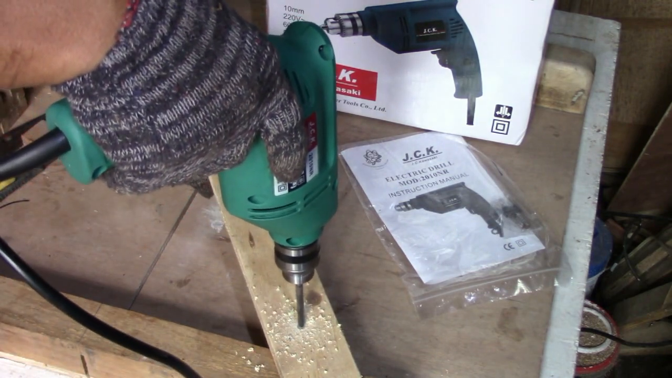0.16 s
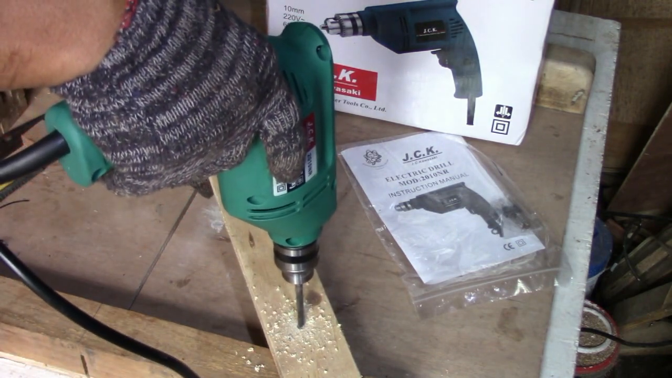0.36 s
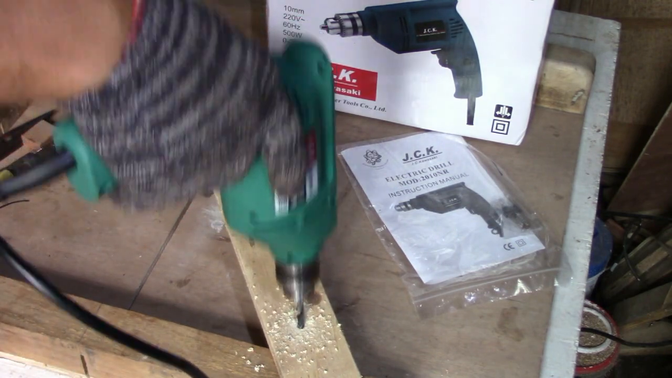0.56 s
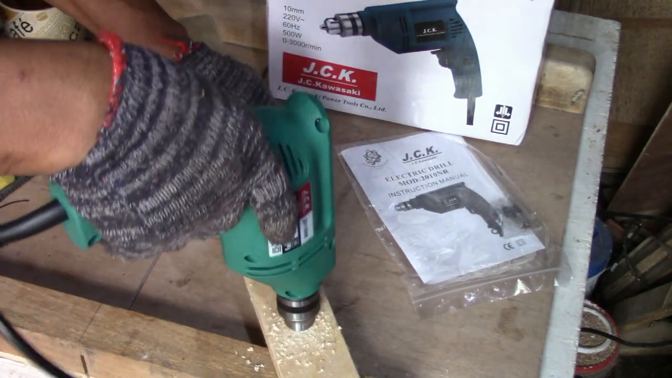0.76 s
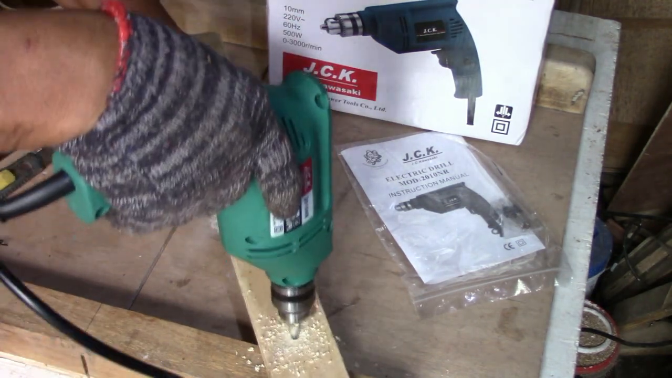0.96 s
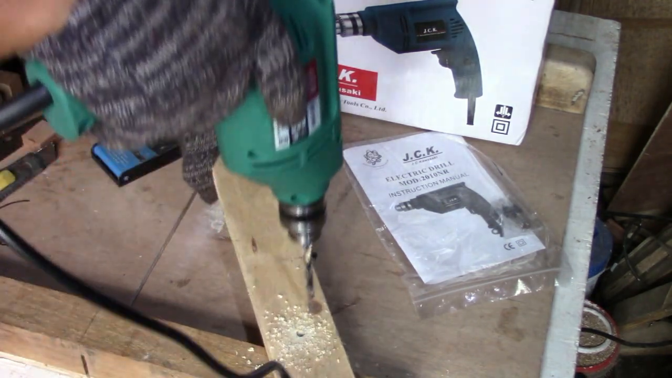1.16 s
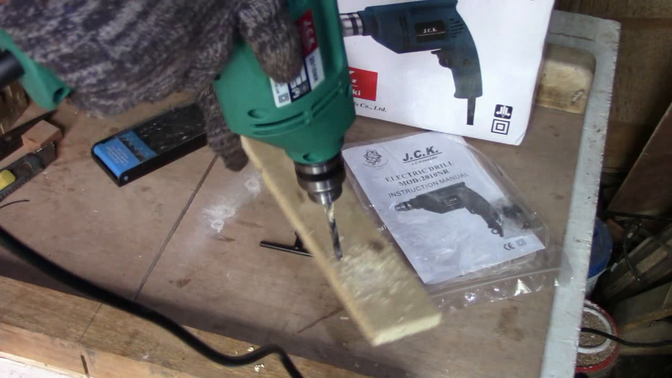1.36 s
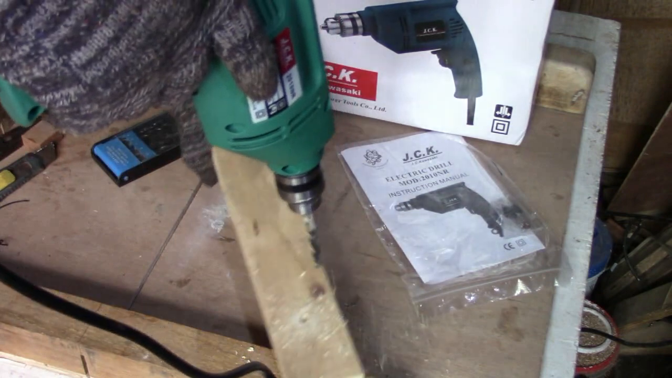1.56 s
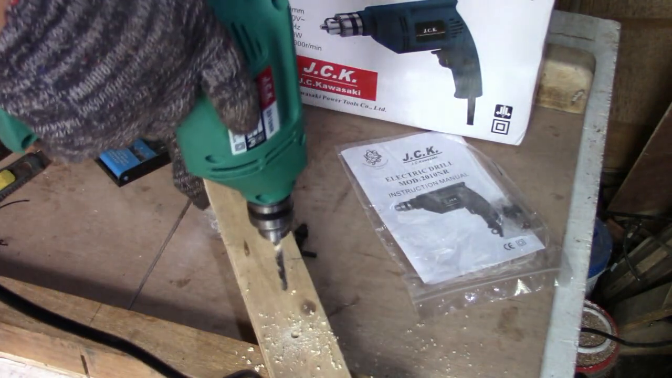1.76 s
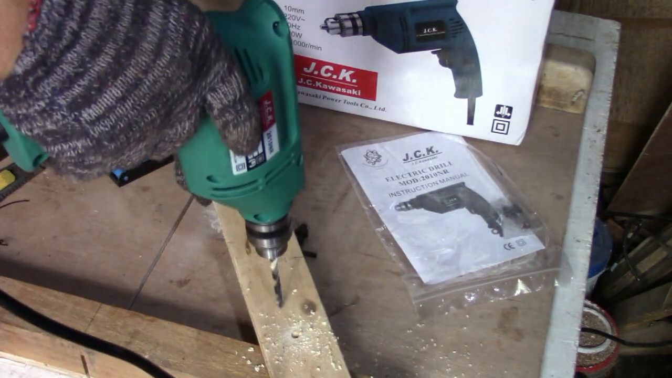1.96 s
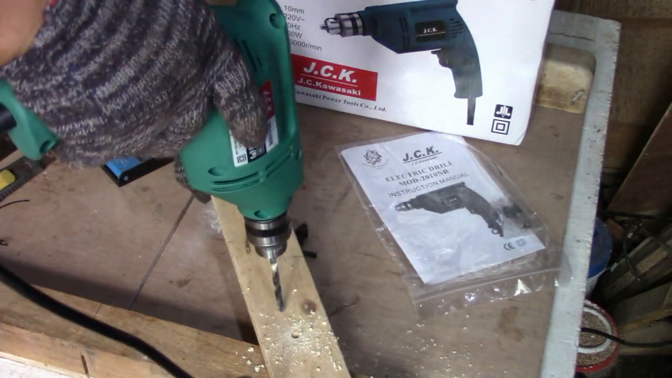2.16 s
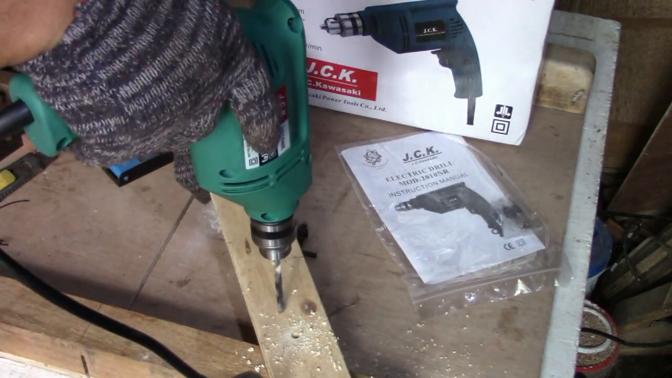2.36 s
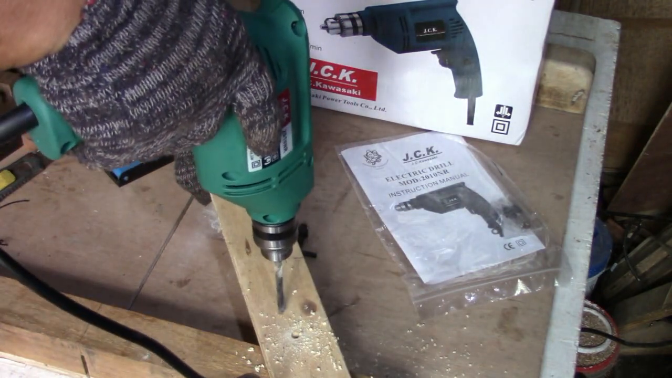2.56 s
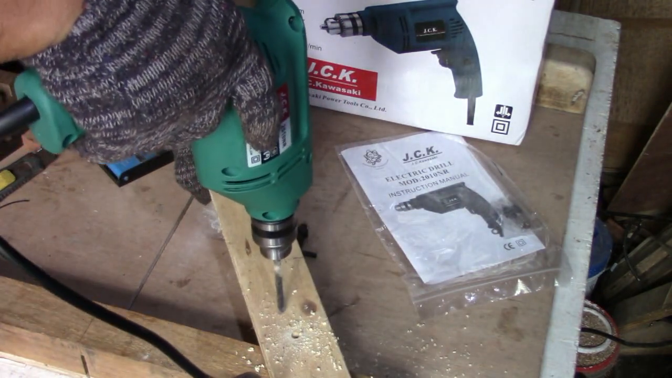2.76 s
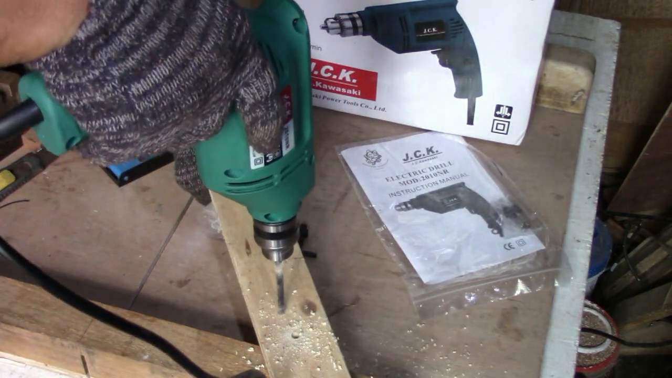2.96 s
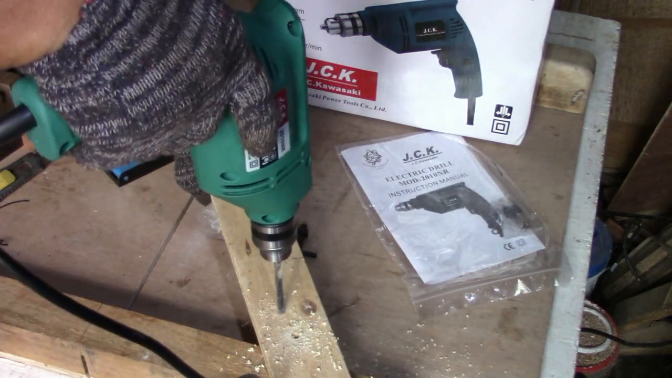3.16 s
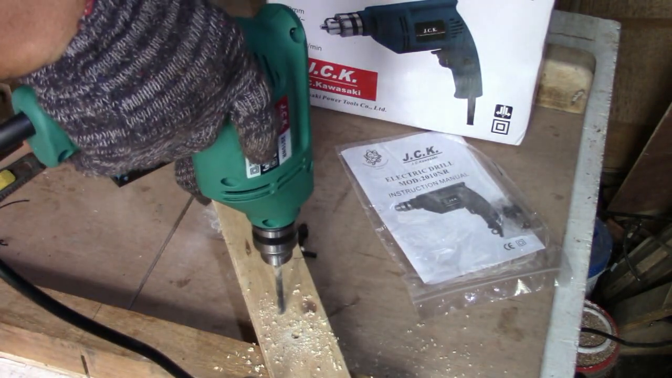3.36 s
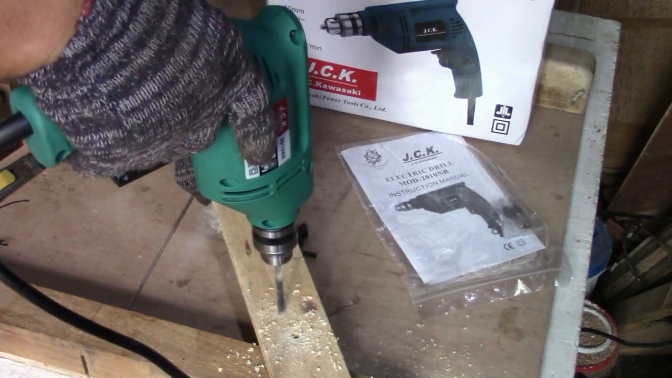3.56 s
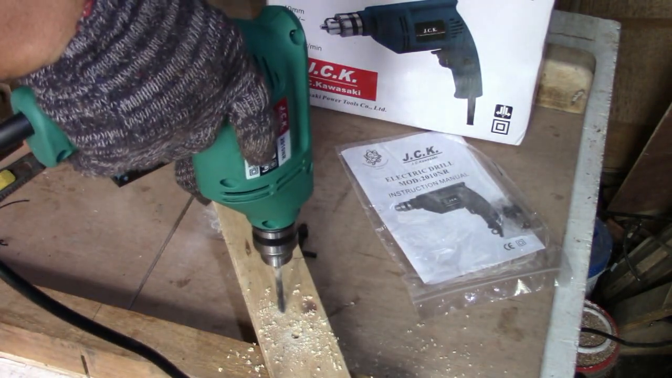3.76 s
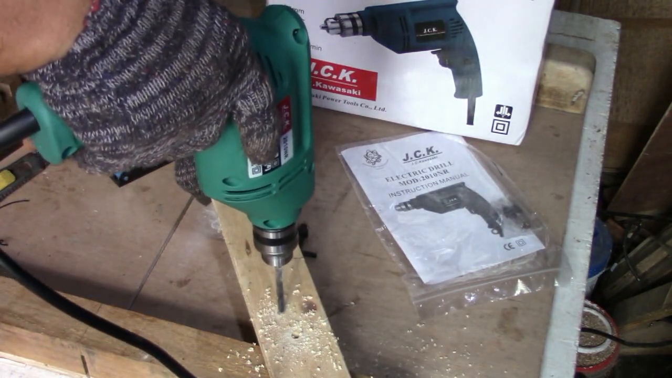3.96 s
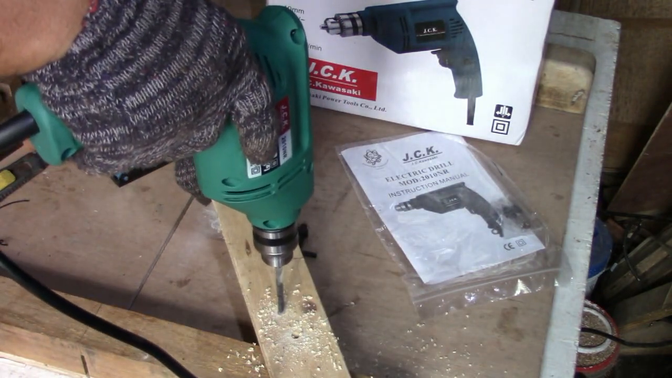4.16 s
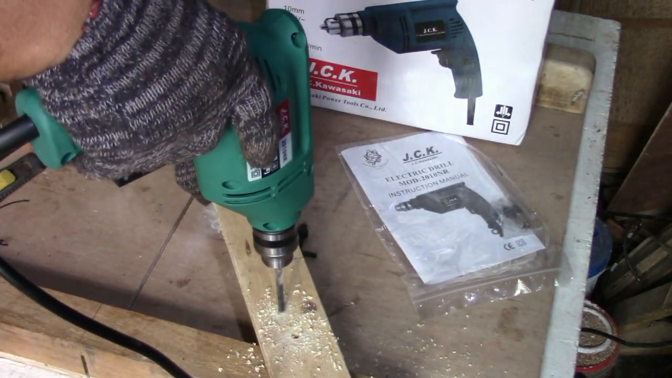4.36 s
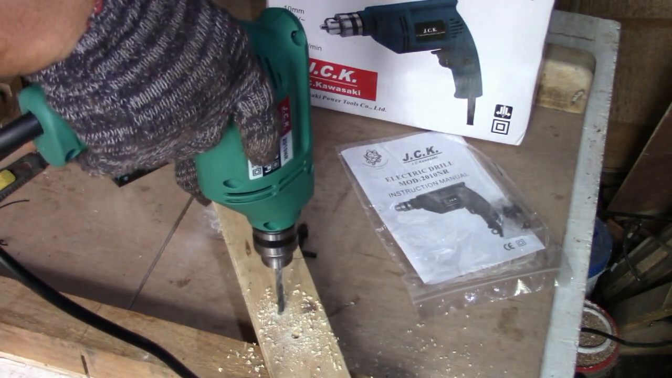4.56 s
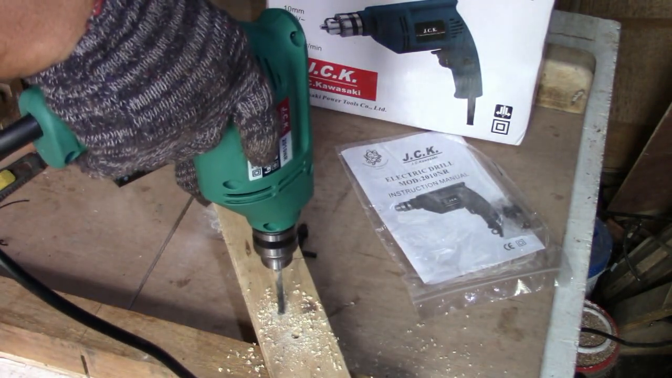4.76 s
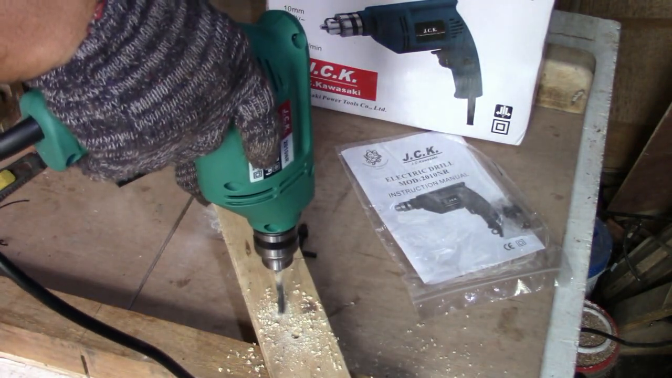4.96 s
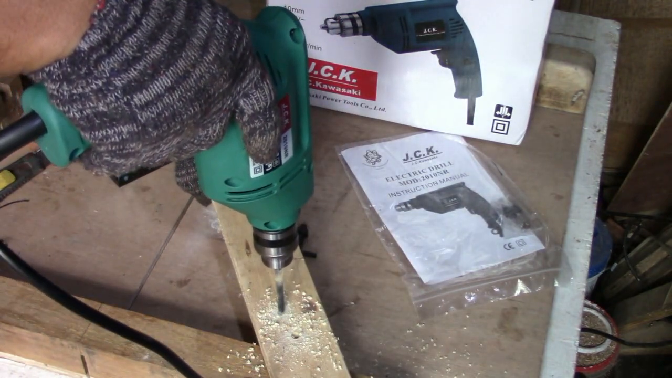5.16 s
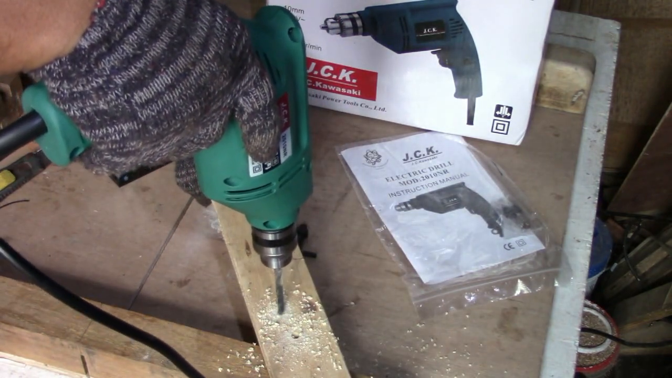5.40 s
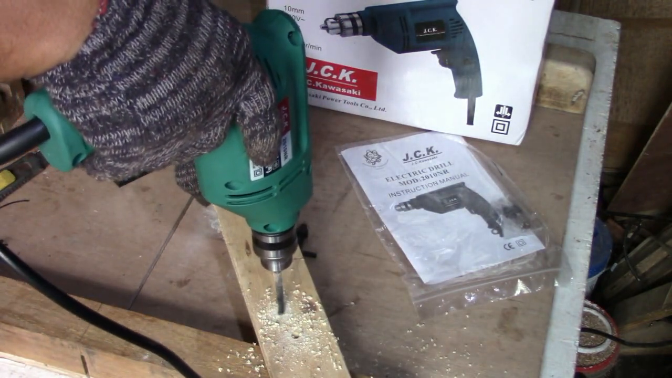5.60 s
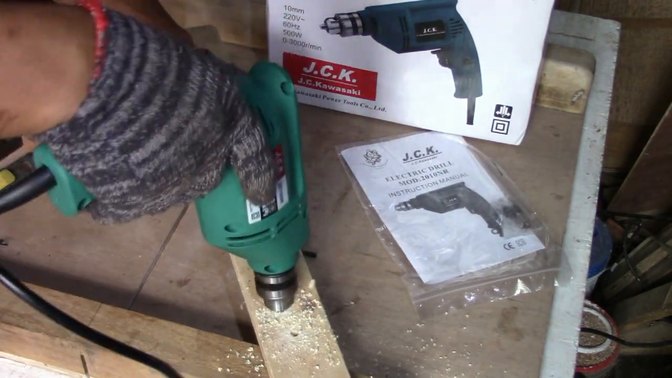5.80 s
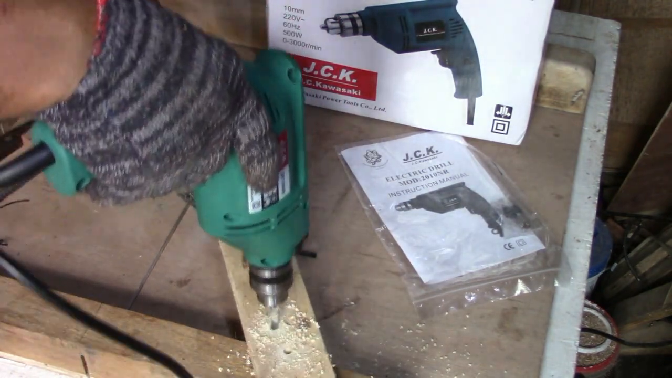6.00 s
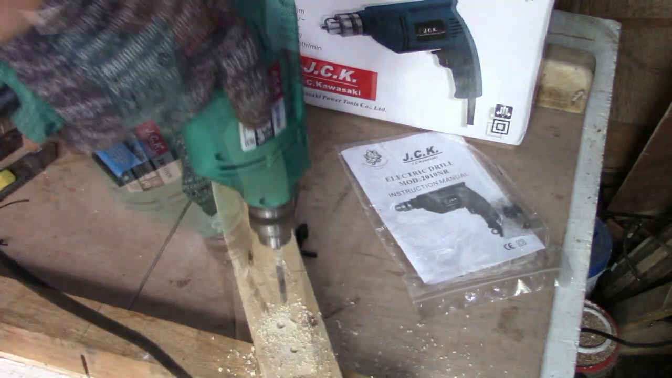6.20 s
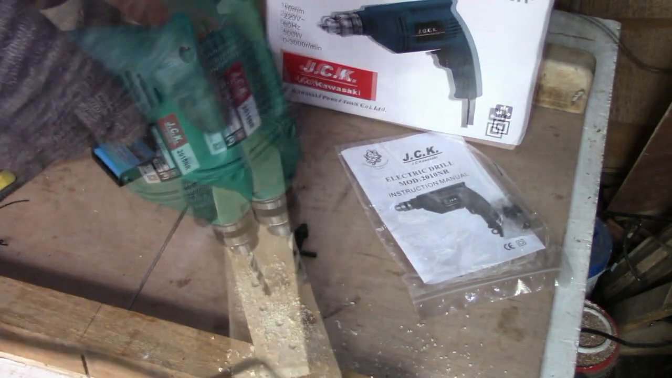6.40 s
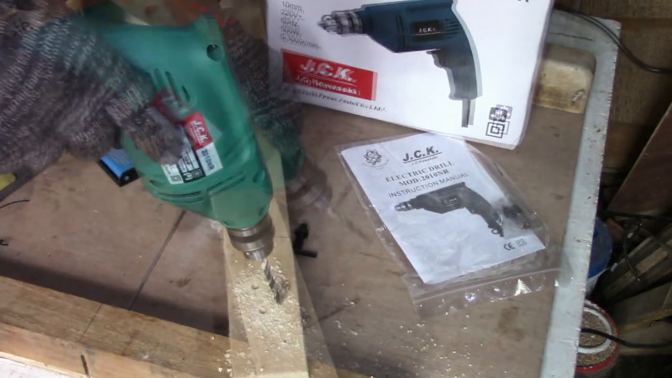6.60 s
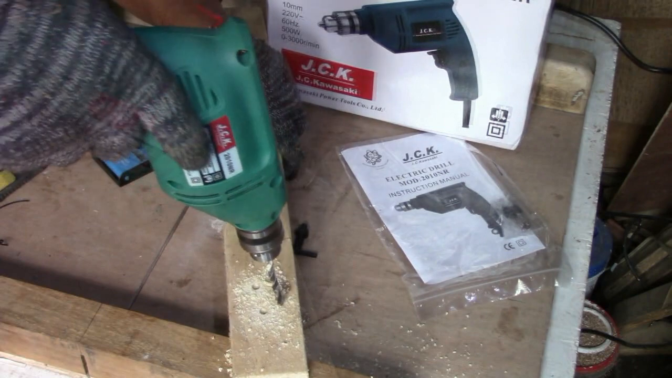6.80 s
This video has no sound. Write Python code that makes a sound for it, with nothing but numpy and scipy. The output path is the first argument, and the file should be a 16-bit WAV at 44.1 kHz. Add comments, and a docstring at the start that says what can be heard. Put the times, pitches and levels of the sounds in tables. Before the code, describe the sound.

A corded electric drill grinds through a plank, sags to a rattling idle with clacks, bores again at a harsh whine, then quickly winds down.

```python
"""On a workshop bench an electric drill bores into a plank, idles with rattling gears, bores again and winds down.
Modulated noise makes the air rush and brush sparks, shaft-locked sinusoids the whine of motor and gears.
Random tooth impacts make the rattle; all three ring through the resonances of the plastic housing.
The unloaded chuck clacks (filtered impacts), the plank knocks on the bench (decaying modes),
and low steady tones hum in the lull, with faint low-frequency air noise behind."""
import sys
import numpy as np
from scipy import signal
from scipy.fft import rfft, irfft
from scipy.io import wavfile
from scipy.ndimage import uniform_filter1d

SR = 44100
rng = np.random.default_rng(int(sys.argv[2]) if len(sys.argv) > 2 else 0)


def materialize(psi):
    """Save the field psi as 16-bit PCM at rate SR to the path in sys.argv[1].

    A 1-D psi becomes a single channel; in a 2-D psi each row is a channel.
    """
    bounded = np.clip(np.atleast_2d(psi).T, -1, 1)
    quanta = np.round(bounded * 32767).astype(np.int16)
    wavfile.write(sys.argv[1], SR, quanta)


N = 301644
TIME = np.arange(N) / SR

# Periods with the bit in the wood. Each row: entry in seconds, start of withdrawal in seconds,
# duration of withdrawal in seconds.
CUT_PERIODS = [(-.3, 0.653, 0.82), (2.442, 5.995, 0.32)]
BITE_S = 0.099  # the load builds up over this time
COAST_S, DIE_S = 6.03, 0.82  # the trigger is let go; length of the final fade
GEAR_RATIO = 15.6  # motor turns per turn of the chuck


def drill(cut_db=-2, air_db=-6, idle_air_db=1, slack_db=-1, tight_db=-8,
          top_db=-1, top_rise=0.81, chug_depth=0.46, scrape_db=-12):
    """Load-dependent excitation: load adds cutting noise and takes up gear slack; treble opens with speed."""
    # Motor shaft speed. Each row: time in seconds, speed in turns per second.
    speed_points = [(0, 416), (.45, 411), (.6, 352), (.8, 255), (1.08, 212), (1.36, 240), (2.47, 176),
                    (2.7, 338), (2.95, 422), (3.2, 442), (3.45, 433), (3.85, 425.5), (4.3, 396.4),
                    (4.68, 373.5), (5.45, 380), (5.65, 371), (5.9, 300), (6.25, 418), (6.45, 380),
                    (6.84, 275)]
    speed = glide(speed_points)
    load = np.clip(by_load(0.19, 0.98), 0, 1)
    turns = np.cumsum(speed * (1 + .0015 * wander(25))) / SR
    chuck_cycle = np.sin(2 * np.pi * turns / GEAR_RATIO)

    # the bit rubs once per turn of the geared-down chuck
    cutting = amp(cut_db) * load * (1 + 0.081 * chuck_cycle) * rush()

    # the tones smear while the shaft speeds up or brakes, and sink into the grind while it speeds up
    slew = uniform_filter1d(np.gradient(speed, TIME), size=4000)  # turns/s per second
    blur = np.minimum(abs(slew) / 7000, .08)
    spin_up_duck_db = -4 * np.clip(slew / 1400, 0, 1)
    whine_db = by_load(-9, 1.5) + spin_up_duck_db
    boring = housing(cutting + amp(whine_db) * whine(turns, blur), ring=1.07, tilt_db=-0.85)

    air_gain = amp(air_db + idle_air_db * (1.5 - load))
    air = air_gain * housing(rush(pulsing=0.043), ring=0.57, tilt_db=-1.0)

    # under load the teeth strike in bunches
    chug = 1 + chug_depth * load * chuck_cycle
    teeth = housing(gear_case(chug * rattle(turns)), ring=0.99, tilt_db=-1.5)
    teeth = amp(slack_db + tight_db * load) * teeth
    scrape = amp(scrape_db - 2.9 * load) * bearing(turns)
    x = boring + air + teeth + scrape

    # level the middle band, so that effort alone sets its loudness
    x = x / np.sqrt(uniform_filter1d(band(x, 1500, 9700) ** 2, size=6000))
    hz, spectrum = np.fft.rfftfreq(N, 1 / SR), rfft(x)
    low = irfft(spectrum / (1 + (hz / 1500) ** 4), N)
    top = irfft(spectrum * (1 - 1 / (1 + (hz / 7500) ** 8)), N)
    middle = x - low - top
    body = low * amp(by_load(4, -2))  # low body of plank and bench
    hiss = top * amp(top_db) * (speed / speed.mean()) ** top_rise  # fast air hisses brighter
    return (middle + body + hiss) * amp(effort_db(speed)) + squeak(turns)


def rush(mains_hz=120.7, pulsing=0.22, chop=0.064):
    """Amplitude-modulated noise: air and sparks swell each mains half wave; the bit chops them irregularly."""
    # mains_hz counts half waves
    swell = 1 + pulsing * np.sin(2 * np.pi * mains_hz * TIME) + chop * wander(54)
    return unit(swell * rng.standard_normal(N))


def whine(turns, blur, flutter=0.28, slip=0.3):
    """Order synthesis: fan, commutator and gear tones follow the shaft, trembling in strength and phase."""
    # Shaft orders. Each row: multiple of the shaft speed, relative level in dB.
    orders = [(3, -18.5), (3.64, -25), (4, -25), (6, -22), (7, -28), (8.5, -20.5), (9, -19.5), (10, -15.5),
              (11, -28), (12, -24), (14.5, -25), (15, -20.5), (18, -23)]
    tremble, drift = wander(42), wander(88)
    out = np.zeros(N)
    for multiple, db in orders:
        strength = np.roll(tremble, rng.integers(N))
        phase = np.roll(drift, rng.integers(N))
        angle = 2 * np.pi * (multiple * turns + rng.random())
        angle = angle + (slip + blur * multiple) * phase
        out += amp(db) * (1 + flutter * strength) * np.cos(angle)
    return np.sqrt(2) * out


def rattle(turns, chance=.62, looseness=.15):
    """Backlash impacts: on some turns of the shaft the gear teeth cross their slack and strike."""
    out, count = np.zeros(N), np.arange(1, int(turns[-1]))
    jittered_turn = count + looseness * rng.standard_normal(len(count))
    when = np.interp(jittered_turn, turns, TIME)
    for s in when[rng.random(len(when)) < chance]:
        strength_db = 2 * np.clip(rng.standard_normal(), -2, 1)
        add(out, s, amp(strength_db) * strike())
    return unit(out)


def strike(scatter=0.3, fade_s=0.002, size=600):
    """Impulsive contact: a sharp blow and a brief decaying chatter, with unit energy together."""
    blow = scatter * rng.standard_normal(size) * np.exp(-np.arange(size) / SR / fade_s)
    blow[0] += 1
    return blow / np.linalg.norm(blow)


def gear_case(x):
    """Resonance: adds the short ring of the gear case to tooth impacts."""
    # Each row: frequency in Hz, width in Hz, gain in dB.
    case_modes = [(1483, 330, -3.5), (2997, 250, -4)]
    return x + sum(amp(db) * band(x, hz - width / 2, hz + width / 2) for hz, width, db in case_modes)


def bearing(turns, size=128, grit=0.29):
    """Periodicity: a scrape recurs each turn, never quite alike, giving a comb of faint high lines."""
    harmonics = np.exp(2j * np.pi * rng.random(size // 2))
    one_turn = irfft(harmonics, 8 * size)
    scrape = np.interp(turns % 1, np.arange(8 * size) / (8 * size), one_turn)
    return unit(band(scrape * (1 + grit * wander(13)), 4900, 6740))


def squeak(turns, level_db=-42, lo_hz=9200, hi_hz=10100, uneven_db=3):
    """Friction noise: as the drill coasts, a thin high rub swells once per turn of the chuck."""
    strokes = 0.27 + np.sin(np.pi * turns / GEAR_RATIO) ** 4
    strokes = strokes * amp(uneven_db * wander(15))
    rub = unit(band(rng.standard_normal(N), lo_hz, hi_hz) * strokes)
    return amp(level_db) * rub * ramp(COAST_S, 0.52) * (1 - .75 * ramp(COAST_S, DIE_S) ** 4)


def housing(x, ring=1.0, tilt_db=0.0, size=4096):
    """Minimum-phase resonance: rings x through the drill's body with a causal, unit-energy response."""
    # Broad colour of the drill. Each row: frequency in Hz, relative level in dB.
    colour = [(30, -76), (100, -67), (170, -47), (300, -37.5), (500, -30.5), (1000, -27.5), (1600, -34),
              (2300, -21.5), (4000, -23), (6200, -16), (8400, -30), (10000, -20), (11500, -34),
              (14000, -38), (15000, -50)]
    # Resonances of housing, chuck and bit. Each row: frequency in Hz, width in Hz, gain in dB before ring.
    resonances = [(707, 210, 3), (1254, 254, 9), (1557, 355, 12.5), (1792, 427, 12), (2148, 21, 8.5),
                  (2402, 46, 7), (2620, 27, 8.5), (2810, 37, 8), (2954, 890, 6), (3527, 432, 16.5),
                  (3745, 79, 9), (4020, 680, -1.5), (4484, 870, 14), (4830, 32, 10), (6370, 230, -3.5),
                  (6710, 24, 10.5), (11360, 490, 11.5)]
    hz = abs(np.fft.fftfreq(size, 1 / SR))
    db = read(colour, hz) + tilt_db * np.log2(1 + hz / 500)  # tilt nears dB per octave in the treble
    db = db + ring * sum(d / (1 + (2 * (hz - f) / w) ** 2) for f, w, d in resonances)
    # the Hilbert transform of the log magnitude gives the phase
    response = np.fft.ifft(np.exp(np.conj(signal.hilbert(np.log(amp(db)))))).real
    return signal.oaconvolve(x, response / np.linalg.norm(response))[:N]


def effort_db(speed):
    """Radiated level grows with speed and load; the bit grabs, and the level dies after the trigger's release."""
    # The bit grabs (+) or eases (-) in the grain. Each row: centre in seconds, half length in seconds,
    # level change in dB.
    grabs = [(0.352, .14, -1), (0.613, 0.067, 1.5), (0.702, 0.033, -3.5), (0.76, 0.018, 4.5),
             (0.982, 0.045, 3), (2.623, 0.19, 4), (3.187, 0.14, 1), (3.746, 0.18, -1.5),
             (4.683, 0.091, 2.5), (5.338, 0.22, -1.5), (5.673, 0.14, 1.5), (5.81, 0.012, -3.5),
             (5.87, 0.056, 2), (5.971, 0.041, -2)]
    octaves = np.log2(speed / 393)  # relative to a cruising speed in turns per second
    running_free = -19.5 + 4.5 * octaves
    added_by_load = contact() * (5.5 + 1 * octaves)
    grabbing = sum(db * np.exp(-((TIME - s) / half_s) ** 2) for s, half_s, db in grabs)
    # a quick drop, then an ever faster fade
    coast = -6.5 * ramp(COAST_S, 0.25) - 12.5 * ramp(COAST_S, DIE_S) ** 6.0
    return running_free + added_by_load + grabbing + coast


def contact():
    """Quasi-static loading: firmness of the bit in the wood, 0-1, through bite, hold and withdrawal."""
    return sum(ramp(enter, BITE_S) - ramp(leave, out_s) for enter, leave, out_s in CUT_PERIODS)


def by_load(free, cutting):
    """Linear load dependence: moves from the free-running to the cutting value as the bit bites."""
    return free + (cutting - free) * contact()


def clacks(ring=0.8, tilt_db=-2, scatter=0.7, fade_s=0.00077):
    """Impact response: single hard clacks of the slack chuck and gears, with little top treble."""
    # Each row: time in seconds, peak level in dB before a common trim.
    clack_times = [(1.124, -6), (1.224, -7), (1.289, -5), (1.314, -8), (1.35, -6), (1.425, -8), (1.466, -7),
                   (1.494, -9), (1.555, -7), (1.611, -6), (1.632, -5), (1.922, -9), (2.004, -11),
                   (2.146, -7), (2.218, -8), (6.253, -6), (6.287, -9), (6.408, -11), (6.428, -11),
                   (6.467, -11), (6.495, -12), (6.582, -14), (6.64, -16), (6.727, -15)]
    out = np.zeros(N)
    for s, peak_db in clack_times:
        blow = gear_case(strike(scatter, fade_s))
        clack = band(housing(blow, ring=ring, tilt_db=tilt_db), 500, 6500)
        add(out, s - .0005, amp(peak_db - .7) * clack / abs(clack).max())
    return out


def knocks(level_db=-9, size=9000):
    """Modal excitation: the plank lifts and chatters on the bench, exciting its decaying modes."""
    # Each row: time in seconds, relative level in dB.
    knock_times = [(0.725, -20), (1.073, -19.5), (2.447, -24), (5.838, -19), (6.594, -25.5)]
    # Modes of the plank. Each row: frequency in Hz, relative level in dB, 60 dB decay time in seconds.
    plank_modes = [(190, -12, 0.18), (357, -11, 0.33), (530, -3, 0.071), (695, 9.5, 0.024), (956, 3.5, .05)]
    out, t = np.zeros(N), TIME[:size]
    wood = sum(amp(db - 60 * t / t60) * np.sin(2 * np.pi * f * t) for f, db, t60 in plank_modes)
    for s, knock_db in knock_times:
        chatter = rng.standard_normal(size) * np.exp(-t / 0.017)
        knock = band(signal.fftconvolve(chatter, wood), 400, 3000)
        add(out, s, amp(knock_db + level_db) * knock / (abs(knock).max() / 2))
    return out


def hum():
    """Additive synthesis: low steady tones waver together slightly in level."""
    # Each row: frequency in Hz, relative level in dB.
    hum_tones = [(156.1, -73.5), (258.4, -61), (414.5, -55), (479.1, -51.5), (522.2, -66), (597.5, -52.5),
                 (882.9, -53.5)]
    # Common gain, highest in the lull. Each row: time in seconds, gain in dB.
    hum_gain = [(0, -14), (1.3, 5), (2.7, -1.5), (6.84, -13)]
    tones = sum(amp(db) * np.sin(2 * np.pi * (f * TIME + rng.random())) for f, db in hum_tones)
    return np.sqrt(2) * tones * amp(curve(hum_gain) + 2.2 * wander(5.9))


def draught(gust_db=3.0):
    """Turbulent pressure noise: lumpy cooling air, independent in each channel."""
    # it blows hardest as the motor speeds up for the second cut, then settles
    start = CUT_PERIODS[1][0]
    puff_db = 14 * ramp(start, BITE_S) * np.exp(-abs(TIME - start) / 2)
    level_db = by_load(-95, -79) + puff_db
    channels = []
    for _ in range(2):
        air = unit(band(rng.standard_normal(N), 28, 130))
        channels.append(air * amp(level_db + gust_db * wander(5.5)))
    return np.array(channels)


def workshop(x, size=8192):
    """Diffuse reflection: direct sound stays central; bench and wall reflections spread it sideways."""
    # Each row: frequency in Hz, left-right likeness from 0 to 1.
    likeness = [(200, .95), (1000, .92), (2500, .82), (3600, .88), (6000, .72), (10000, .45)]
    # Each row: frequency in Hz, left minus right level in dB.
    balance = [(100, 1), (500, -2), (2400, -1.8), (8000, -0.6)]
    hz = np.fft.rfftfreq(N, 1 / SR)
    t = TIME[:size]
    echoes = rng.standard_normal(size) * amp(-60 * t / .25) * (t > .004)  # 60 dB decay in 0.25 s
    direct = rfft(x)
    spread = direct * rfft(echoes / np.linalg.norm(echoes), N)
    same = np.clip(read(likeness, hz), 0, .95)
    lean = amp(read(balance, hz) / 2)
    side = spread * np.sqrt((1 - same) / (1 + same))
    return irfft(np.array([(direct + side) * lean, (direct - side) / lean]), N)


def amp(db):
    """Logarithmic level: decibels to gain."""
    return 10 ** (np.asarray(db) / 20)


def unit(x):
    """Power normalisation: scales to rms 1."""
    return x / np.sqrt(np.mean(x ** 2) + 1e-20)


def curve(rows):
    """Linear interpolation: a time table at every sample."""
    return np.interp(TIME, *np.transpose(rows))


def read(points, hz):
    """Logarithmic pitch scale: interpolates a spectrum table over log frequency."""
    f, value = np.transpose(points)
    return np.interp(np.log(hz + 1), np.log(f), value)


def ramp(start_s, length_s):
    """Linear onset: rises from 0 to 1 and stays there."""
    return np.clip((TIME - start_s) / length_s, 0, 1)


def glide(rows):
    """Monotone cubic interpolation: smooth arcs that level out at the table's peaks and dips."""
    s, value = np.transpose(rows)
    slope = np.diff(value) / np.diff(s)
    a, b = slope[:-1], slope[1:]
    # harmonic mean of the neighbouring slopes, zero where they change sign
    inner = 2 * np.maximum(a * b, 0) / (a + b + 1e-12)
    tangent = np.r_[0, inner, slope[-1]]
    place = np.interp(TIME, s, np.arange(len(s)))
    k = np.minimum(place.astype(int), len(slope) - 1)
    u = place - k
    bend = (1 - u) * ((1 - u) * (tangent[k] - slope[k]) - u * (tangent[k + 1] - slope[k]))
    return value[k] + (TIME - s[k]) * (slope[k] + bend)


def wander(hz):
    """Low-passed Gaussian noise of rms 1: smooth random change, mostly slower than hz."""
    f = np.fft.rfftfreq(N, 1 / SR)
    return unit(irfft(rfft(rng.standard_normal(N)) * np.exp(-(f / hz) ** 2), N))


def band(x, lo_hz, hi_hz):
    """Butterworth band-pass filtering."""
    return signal.sosfilt(signal.butter(2, [lo_hz, hi_hz], "band", fs=SR, output="sos"), x)


def add(mix, s, sound):
    """Superposition: adds a sound into the mix at time s."""
    part = mix[round(s * SR):][:len(sound)]
    part += sound[:len(part)]


def scene():
    """Superposition of drill, plank and hum in the workshop, with the draught."""
    return workshop(drill() + clacks() + knocks() + hum()) + draught()


def record(dry):
    """Soft saturation rounds the loudest peaks; a linear-phase low-pass then limits the band."""
    rounded = dry / (1 + (dry / .95) ** 8) ** (1 / 8)
    low_pass = signal.firwin(511, 15600, window=("kaiser", 9), fs=SR)  # cutoff in Hz
    return signal.oaconvolve(rounded, low_pass[None], "same", axes=1)


dry = scene()
out = record(dry)
materialize(out)
```